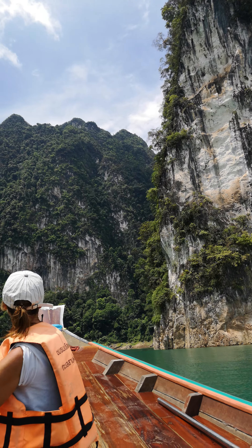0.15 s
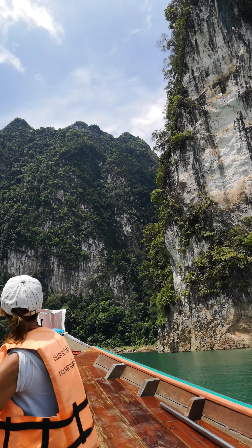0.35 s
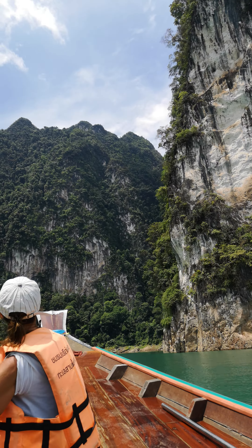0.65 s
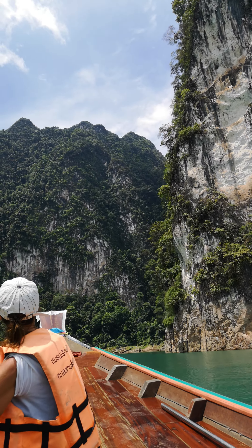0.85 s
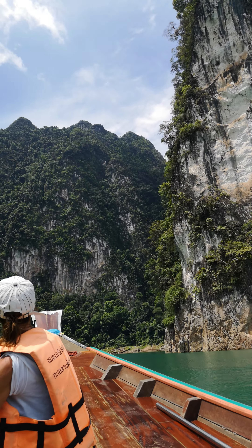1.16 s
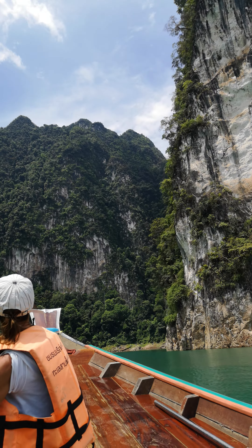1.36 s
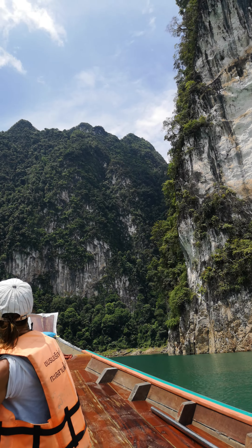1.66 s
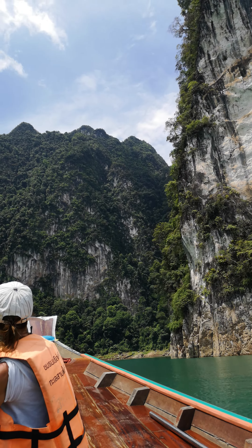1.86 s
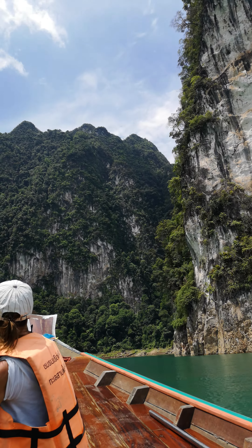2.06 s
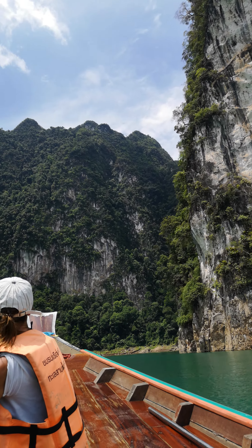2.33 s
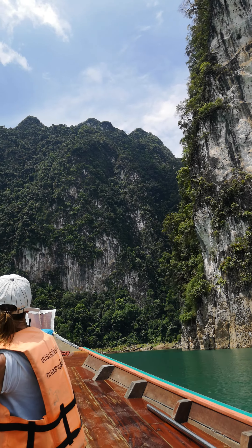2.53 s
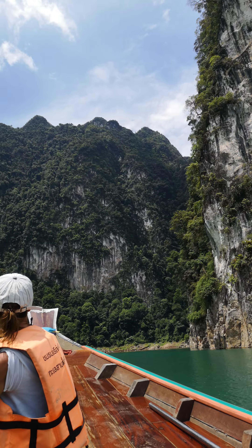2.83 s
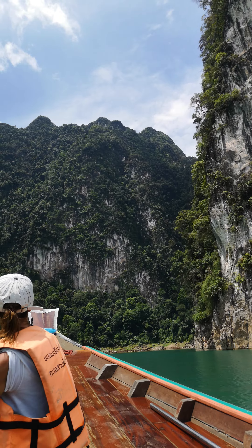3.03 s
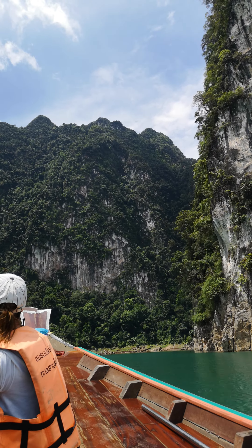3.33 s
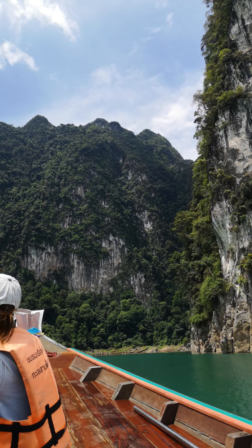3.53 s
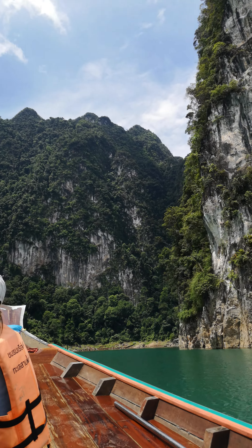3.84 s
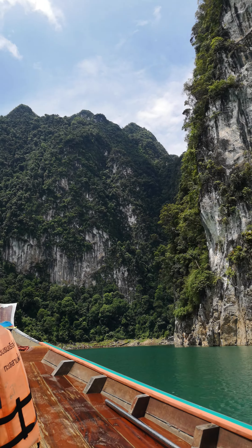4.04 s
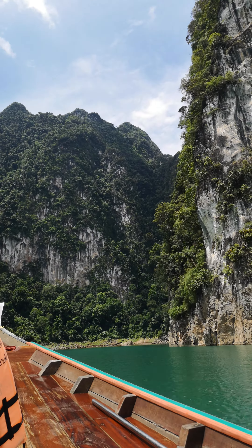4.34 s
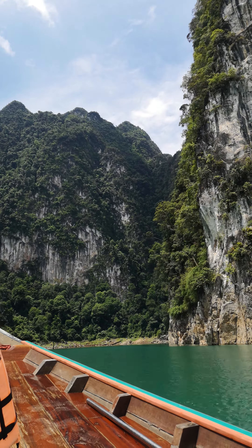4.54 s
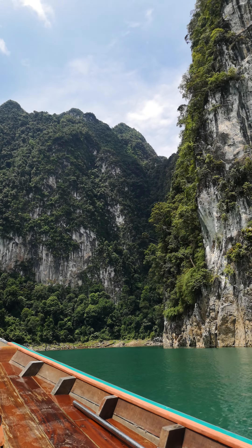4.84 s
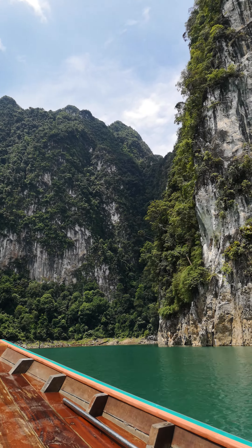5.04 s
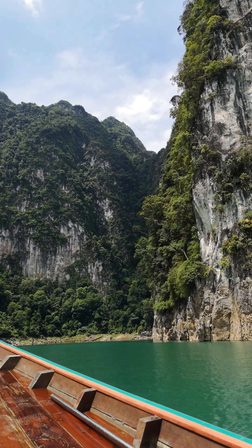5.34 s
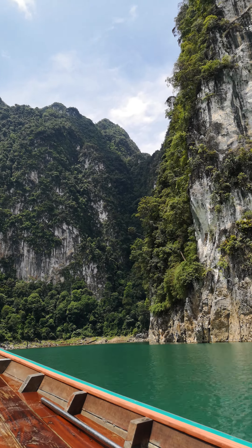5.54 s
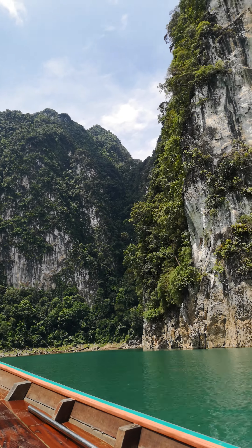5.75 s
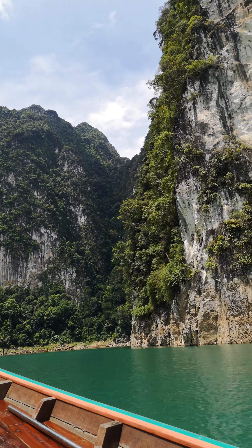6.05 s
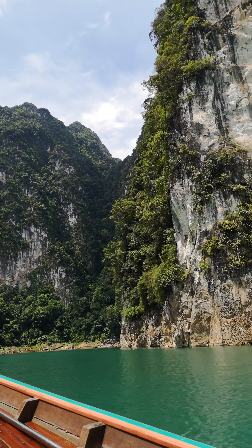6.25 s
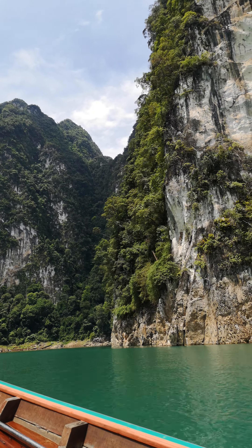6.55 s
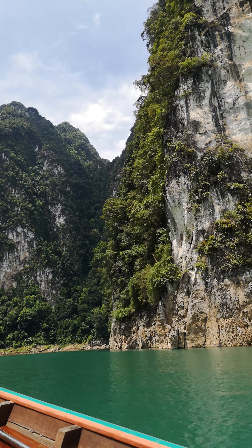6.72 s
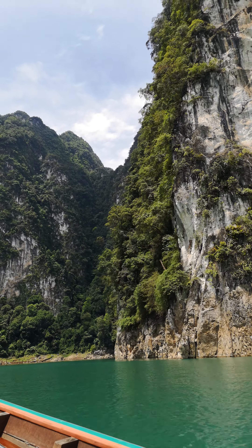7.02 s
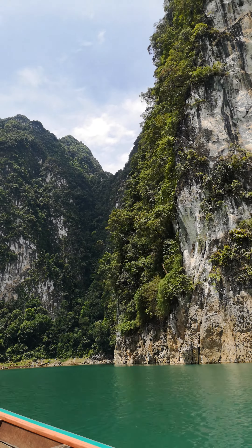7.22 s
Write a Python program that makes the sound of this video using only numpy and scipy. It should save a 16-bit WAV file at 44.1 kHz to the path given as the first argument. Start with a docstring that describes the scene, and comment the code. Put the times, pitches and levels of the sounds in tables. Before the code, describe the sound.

Steady deep motor drone of a wooden boat crossing a lake, a loose fitting buzzing briefly, with hull wash and thumping wind gusts.

```python
"""An engine's exhaust drones on the shaft orders of a longtail boat crossing a lake, heard near the bow.
Its balance follows the revs; the block clatters in step, a thin whine sings with the shaft speed,
and around the highest revs a loose fitting, ringing through its modes, buzzes in bouts.
Shaped noise gives the water along the hull, a sparse patter of bow spray, and a headwind with gusts
and eddies that buffet the microphone; one small click is a sharp pulse over a decaying sine."""
import sys
import numpy as np
from scipy import signal
from scipy.fft import rfft, irfft
from scipy.io import wavfile
from scipy.ndimage import uniform_filter1d

SR = 44100
rng = np.random.default_rng(int(sys.argv[2]) if len(sys.argv) > 2 else 0)


def unload_wav(signal):
    """Save mono or channel-first audio to the path in sys.argv[1] as 16-bit WAV at rate SR, clipped to [-1, 1]."""
    wavfile.write(
        sys.argv[1],
        SR,
        np.round(np.clip(np.atleast_2d(signal).T, -1, 1) * 32767).astype(np.int16),
    )


N = 325458
TIME = np.arange(N) / SR
BINS = np.maximum(np.arange(N // 2 + 1) * SR / N, 1)  # f/Hz of each spectral line

# Engine speed: t/s, shaft rate f/Hz
SHAFT_SPEED = [(0.0, 46.21), (1.0, 46.5), (1.8, 48.11), (2.2, 47.53), (2.8, 47.65), (3.0, 47.02),
               (3.6, 46.76), (4.0, 46.29), (4.6, 46.4), (6.0, 45.55), (6.4, 44.95), (7.38, 45.52)]
START_TURN, CRUISE_HZ = 1.388, 46.5
# Shaft rates at which the drone is tabulated: f/Hz, slow to fast
REVS_HZ = (45.1, 45.7, 46.35, 47.4, 48.0)
# Exhaust drone: multiple of the shaft rate, then level/dB at each of the five rates
DRONE_ORDERS = [(1, -27, -23.5, -21.5, -20, -19.5), (1.5, -56, -49, -47, -42, -46),
                (2, -23, -19.5, -19, -19, -19.5), (2.5, -26.5, -30, -27, -34, -30),
                (3.5, -35, -28, -37, -36.5, -53), (4, -33, -35, -39, -39, -44),
                (4.5, -45, -40.5, -34.5, -36.5, -36), (5, -38.5, -47, -58, -38, -45)]
# Third order, which swells and sinks on its own: t/s, level/dB
THIRD_ORDER_LEVEL = [(0, -25), (0.65, -28.5), (1.2, -23), (1.7, -19.5), (2.1, -24.5), (2.6, -29),
                     (3.15, -22.5), (4.1, -31), (4.5, -25.5), (5.2, -35), (6.2, -45), (6.6, -29.5),
                     (7.38, -37)]
# Faint upper exhaust lines: multiple of the shaft rate, mean level/dB
UPPER_ORDERS = [(5.5, -57), (6, -46), (6.5, -70), (7, -48), (7.5, -55.5), (8, -54), (8.5, -56.5),
                (9, -50.5), (10, -54), (12, -56)]
# Unevenness of the firings, rms, in strength and in timing
FIRING_SCATTER_DB, FIRING_JITTER_TURNS = 0.45, 0.004

# Resonances of block and hull: f/Hz, width/Hz, left relative level/dB, right relative level/dB
BLOCK_MODES = [(415.4, 26, 9, 0), (685, 110, 4.5, -5), (1072, 99, 6, 2), (1477, 240, -20, 1),
               (1882, 39, 5.5, 7.5), (1993, 27, 5.5, 6.5), (2060, 130, -3, -7), (2450, 73, -5.5, -3),
               (2700, 430, -6.5, -4.5), (3080, 880, -9, -8.5), (3530, 180, -10.5, -6.5),
               (4000, 57, -16, -5), (5590, 590, -31, -12), (6570, 19, -33, -33), (8600, 86, -6, -40)]
# Bands of mechanical hiss: f/Hz, width/Hz, left relative level/dB, right relative level/dB
HISS_BANDS = [(4570, 53, -5, 5), (5450, 110, 2, -1), (8700, 210, 0.5, -9), (8950, 30, -9, -10)]
# Successive blows of a two-turn engine cycle: relative level/dB
KNOCKS_DB, VALVES_DB = (-7.0, -14, -7.5, -16), (-6, -11, 3, -9.0)
# Slow swell along the way: t/s, clatter gain/dB, wash gain/dB
SLOW_SWELL = [(0, 0, -0.05), (2.4, 0.5, 0.8), (3.6, -0.1, 0.2), (4.6, -1, -0.5), (5.25, 0.5, 1.5),
              (5.7, 0.5, 0.5), (7.05, 2.5, 1.2), (7.27, 4.5, 1), (7.38, 5.5, 0.5)]

# Whine at cruising speed: its pitch, the rise in Hz per Hz of shaft rate, and its rms waver
WHINE_HZ, WHINE_RISE, WHINE_WAVER_HZ = 6510, 210, 14
# Mean peak levels of tone and octave before flutter; rms depths of flutter and slow fading
WHINE_DB, WHINE_OCTAVE_DB = -62, -79
WHINE_FLUTTER_DB, WHINE_FADE_DB = 4, 1.5

# Modes of the loose fitting: f/Hz, width/Hz, left relative level/dB, right relative level/dB
FITTING_MODES = [(904, 83, -10.5, -5.5), (1366, 43, -30, -0.5), (1430, 36, -17, 1), (1542, 26, -2, 0.5),
                 (1645, 70, -17, -10.5), (1849, 32, -9, 2.5), (1938, 40, -11, 1.5), (2050, 78, -8, -4),
                 (2170, 32, -12, 0), (2337, 36, -12, -3.5), (2740, 160, -23, -17), (3720, 170, -31, -24.5)]
# Its lowest, longest ringing mode: the same columns
FITTING_HUM_MODE = [(778, 24, -6, 3)]
# Bouts of the fitting: start t/s, length/s, buzz level/dB, hum level/dB
RATTLE_BOUTS = [(0.976, 0.1, -31.5, -33), (1.054, 0.13, -28, -36), (1.187, 0.1, -26.5, -32.5),
                (1.696, 0.18, -32, -45), (2.005, 0.14, -29.5, -38), (2.096, 0.31, -26.5, -34.5),
                (2.475, 0.04, -26, -33), (2.536, 0.21, -31, -36), (2.736, 0.078, -27.5, -33.5),
                (2.886, 0.18, -31.5, -37), (3.026, 0.08, -33.5, -37), (3.38, 0.1, -46, -44)]
BOUT_ATTACK_S, BOUT_RELEASE_S, HUM_RELEASE_S = 0.025, 0.055, 0.08
# Treble that follows the force of the rattle: f/Hz, gain/dB
BRIGHT_EDGE = [(900, -34), (1500, -32), (2200, -9.0)]
# Point of the turn at which it is thrown; spacing and scatter of the bounces
THROW_TURN, BOUNCE_TURNS, BOUNCE_JITTER_TURNS = 0.46, 0.125, 0.03
# Contacts and strengths of alternate throws
CONTACTS, THROWS_DB = (5, 5), (0.4, -0.4)
# Scatter of throws and contacts, loss at each bounce, scraping relative to the contacts
THROW_SCATTER_DB, CONTACT_SCATTER_DB = 0.6, 0.9
BOUNCE_LOSS_DB, SCRAPE_DB = 1.0, -1.5

# Click: time, and the scale of its edge and of its body
TICK_S, TICK_EDGE_DB, TICK_BODY_DB = 2.7481, -13.5, -16

# Water along the hull before its swell: f/Hz, left level/dB per Hz, right level/dB per Hz
WASH_SPECTRUM = [(149, -51, -48.5), (448, -65.5, -65.5), (713, -65.5, -60), (1270, -71.5, -70),
                 (1870, -68.5, -64.5), (2680, -74.5, -72), (3730, -78, -81), (4530, -81, -86),
                 (8750, -80.5, -84), (9130, -79, -81.5), (9960, -99, -87.5), (11860, -101, -97.5),
                 (15500, -100, -100)]
# Rms depths of the slow rise and fall of the wash and of the surge of its spray
WASH_SWELL_DB, SPRAY_SURGE_DB = 0.55, 0.4
# Thicker showers of bow spray: peak t/s, length/s, level/dB
SPRAY_SHOWERS = [(1.39, 0.06, -45), (2.504, 0.066, -41), (2.68, 0.21, -47), (4.28, 0.19, -45),
                 (4.68, 0.07, -44), (6.18, 0.09, -43)]
# Colour of the drops: f/Hz, relative level/dB per Hz
DROP_SPECTRUM = [(800, -31), (2200, -7.5), (3100, 0), (4300, -12), (8000, -24), (12000, -42)]
DROPS_PER_S, PATTER_DB = 1500, -53  # rate at each port; level between showers

# Colour of the wind's buffeting: f/Hz, relative level/dB per Hz
BUFFET_SPECTRUM = [(50, -15), (80, 2), (125, 6.5), (170, -1), (230, -3.5), (300, -12), (400, -18.5),
                   (600, -29), (1500, -77), (6000, -90)]
# Colour of its deep rumble: f/Hz, relative level/dB per Hz
RUMBLE_SPECTRUM = [(4, -27), (14, 19.5), (30, 7.5), (65, 12.5), (95, -24), (200, -48), (1500, -100)]
# Mean headwind levels, and the rms depth and rate of their common wander
BUFFET_DB, RUMBLE_DB = -26.7, -32.5
HEADWIND_WANDER_DB, HEADWIND_WANDER_HZ = 0.56, 6.9
# Brief rises and lulls of the headwind: peak t/s, length/s, gain/dB
HEADWIND_CHANGES = [(0.1, 0.28, 3), (2.418, 0.2, 1), (3.1, 0.17, -3), (3.48, 0.23, 2), (4.2, 0.23, -3),
                    (4.87, 0.26, -4)]
# Gusts: peak t/s, length/s, buffet level/dB, rumble level/dB
WIND_GUSTS = [(0.49, 0.58, -24, -18), (0.732, 0.19, -29.5, -29), (1.142, 0.22, -15.5, -17.5),
              (1.573, 0.17, -21, -36), (1.732, 0.11, -20.5, -15.5), (1.998, 0.15, -25.5, -20.5),
              (2.74, 0.22, -18.5, -22), (2.906, 0.091, -17, -13.5), (3.3, 0.16, -30, -20),
              (3.678, 0.079, -20.5, -20), (3.837, 0.093, -25, -34), (4.02, 0.1, -38, -15),
              (4.467, 0.3, -19, -21), (5.183, 0.14, -27, -26), (5.572, 0.37, -21.5, -25),
              (6.043, 0.064, -20.5, -16), (6.313, 0.23, -26, -22), (6.71, 0.2, -22.5, -23),
              (7.353, 0.13, -23, -38)]
# Eddies that strike mostly one port: peak t/s, mean level/dB of the ports, left minus right/dB
PORT_EDDIES = [(.483, -35, 13), (1.086, -28, 19), (1.11, -30, -11), (1.731, -24, -12), (2.885, -26, -16),
               (4.413, -33, -25), (4.557, -33, -14), (6.029, -31, 22), (6.395, -34, 20)]
# Colour of their thump: f/Hz, relative level/dB per Hz
EDDY_SPECTRUM = [(60, -5), (200, 15.5), (400, 3.5), (700, -5), (1500, -29), (6000, -70)]

# Likeness of the two channels: f/Hz, correlation
PORT_LIKENESS = [(40, 0.92), (130, 0.93), (250, 0.68), (400, -0.068), (600, -0.62), (800, -0.75),
                 (1400, 0.17), (2000, -0.65), (2700, 0.074), (3400, 0.63), (4600, -0.39), (5500, 0.081),
                 (8000, 0)]
TOP_HZ = 15200  # edge of the final low-pass


def exhaust(turns, shaft_hz):
    """Fourier synthesis: uneven periodic firings sum to shaft orders whose strengths shift with the revs."""
    angle = 2 * np.pi * (turns + FIRING_JITTER_TURNS * walk(CRUISE_HZ))

    def line(order):
        halves = round(2 * order)
        # half orders lead in phase by 1.19 rad
        return np.sin(halves / 2 * angle + 1.19 * (halves % 2))

    vigour_db = FIRING_SCATTER_DB * walk(CRUISE_HZ)
    drone = 0
    for order, *levels_db in DRONE_ORDERS:
        level_db = np.interp(shaft_hz, REVS_HZ, levels_db)
        # a harder firing lifts the higher orders most
        drone = drone + undb(level_db + (order - 1.5) * vigour_db) * line(order)
    third = undb(curves(THIRD_ORDER_LEVEL)[0] + vigour_db) * line(3)
    upper = 0
    for order, db in UPPER_ORDERS:
        gain = undb(db + 1.94 * walk(1.56))
        phase = round(2 * order) / 2 * angle + 0.31 * walk(4.4)
        upper = upper + gain * np.sin(phase)
    return np.sqrt(2) * (drone + third + upper)  # sine amplitudes from rms levels


def clatter(turns):
    """Impact excitation: four uneven knocks a cycle ring the block; the valves tick over a steady hiss."""
    knocks = strokes(turns + .32, undb(KNOCKS_DB), sharpness=2.2, scatter_db=2.5)
    block = undb(-38.0) * ring(air_noise() * (knocks + 0.12), BLOCK_MODES)
    valves = strokes(turns + 0.29, undb(VALVES_DB), sharpness=0.89, scatter_db=4.5)
    return block + undb(-54.5) * ring(air_noise() * (valves + 0.41), HISS_BANDS)


def whine(shaft_hz):
    """Frequency modulation: a fast-spinning part sings with the revs, fading and fluttering at each port."""
    pitch_hz = WHINE_HZ + WHINE_RISE * (shaft_hz - CRUISE_HZ) + WHINE_WAVER_HZ * walk(40)
    angle = 2 * np.pi * np.cumsum(pitch_hz) / SR
    tone = 0
    for harmonic, db in enumerate((WHINE_DB, WHINE_OCTAVE_DB), 1):
        tone = tone + undb(db + WHINE_FADE_DB * walk(1.9)) * np.sin(harmonic * angle)
    return tone * np.array([undb(WHINE_FLUTTER_DB * walk(60)) for _ in range(2)])


def rattle(turns):
    """Modal excitation: thrown once a turn, a loose fitting bounces and scrapes; its lowest mode hums on."""
    buzz_bouts = [undb(db) * bout(s, length, BOUT_RELEASE_S) for s, length, db, _ in RATTLE_BOUTS]
    hum_bouts = [undb(db) * bout(s, length, HUM_RELEASE_S) for s, length, _, db in RATTLE_BOUTS]
    force, sway = np.max(buzz_bouts, axis=0), np.max(hum_bouts, axis=0)
    rubbing = strokes(turns - THROW_TURN, undb([0, -1]), sharpness=2.0, scatter_db=1.5)
    scrape = unit(air_noise() * rubbing)
    buzz = ring(at_ports(contacts(turns)) + undb(SCRAPE_DB) * scrape, FITTING_MODES)
    # harder blows ring brighter, softer ones duller
    edge = colour(buzz, BRIGHT_EDGE)
    brightness = 1.1 * (force / force.max() - .68)
    return force * (buzz + brightness * edge) + sway * ring(scrape, FITTING_HUM_MODE)


def contacts(turns):
    """Repeated impact: a throw once a turn starts a run of weakening, ever less regular bounces."""
    whole_turns = np.arange(int(turns[0]) + 1, int(turns[-1]) - 1)
    turn, bounce = np.meshgrid(whole_turns, np.arange(max(CONTACTS)))
    late, size = rng.standard_normal((2, *turn.shape))
    throw_db = np.array(THROWS_DB)[turn % 2] + THROW_SCATTER_DB * rng.standard_normal(turn.shape[1])
    jitter = BOUNCE_JITTER_TURNS * np.sqrt(bounce / 2) * late
    at = turn + THROW_TURN + BOUNCE_TURNS * bounce + jitter
    strength = undb(throw_db + CONTACT_SCATTER_DB * size - BOUNCE_LOSS_DB * bounce)
    strength = strength * (bounce < np.array(CONTACTS)[turn % 2])
    samples = np.searchsorted(turns, at)
    return unit(np.bincount(samples.ravel(), strength.ravel(), N))


def bout(start_s, length_s, release_s):
    """Exponential relaxation: chatter builds up, holds and dies away."""
    age = np.maximum(TIME - start_s, 0)
    rise = 1 - np.exp(-age / BOUT_ATTACK_S)
    return rise * np.exp(-np.maximum(age - length_s, 0) / release_s)


def tick():
    """Impulse response: a sharp push and pull starts a brief, damped, dull knock."""
    age = TIME - TICK_S
    swing = age / .00003
    pulse = -swing * np.exp(-swing ** 2 / 2)
    knock = (age > 0) * np.exp(-np.abs(age) / 0.0016) * np.sin(2 * np.pi * 650 * age)
    return undb(TICK_EDGE_DB) * pulse + undb(TICK_BODY_DB) * knock


def wash():
    """Turbulent noise: water sheets off the hull, its spray flickering, its bands swelling independently."""
    spray = undb(SPRAY_SURGE_DB * walk(9.8) + 0.67 * walk(90) + 0.81 * walk(1200))
    water = np.sqrt(SR / 2) * rfft(air_noise() * spray) * undb(across(WASH_SPECTRUM))
    half_octave = np.clip(2 * np.log2(BINS / 400), 0, 10)
    total = 0
    for k in range(11):
        overlap = np.maximum(1 - np.abs(half_octave - k), 0)  # neighbouring bands sum to 1
        total = total + irfft(water * overlap, N) * undb(WASH_SWELL_DB * walk(3.95))
    return total


def splashes():
    """Shot noise: bow spray falls back as random drops, now and then in a thicker shower."""
    drops = (rng.random((2, N)) < DROPS_PER_S / SR) * rng.standard_normal((2, N))
    showers = undb(PATTER_DB) + sum(undb(db) * swell(s, length) for s, length, db in SPRAY_SHOWERS)
    return showers * unit(colour(drops, DROP_SPECTRUM))


def wind():
    """Turbulent pressure: headwind and gusts shake both ports; small eddies thump mostly one."""
    changes_db = sum(db * swell(s, length) for s, length, db in HEADWIND_CHANGES)
    headwind = undb(changes_db + HEADWIND_WANDER_DB * walk(HEADWIND_WANDER_HZ))
    buffet_gusts = sum(undb(db) * swell(s, length) for s, length, db, _ in WIND_GUSTS)
    rumble_gusts = sum(undb(db) * swell(s, length) for s, length, _, db in WIND_GUSTS)
    # independent pressures add in power
    buffet_level = np.hypot(undb(BUFFET_DB) * headwind, buffet_gusts)
    rumble_level = np.hypot(undb(RUMBLE_DB) * headwind, rumble_gusts)
    buffet = buffet_level * unit(colour(air_noise(), BUFFET_SPECTRUM))
    rumble = rumble_level * unit(colour(air_noise(), RUMBLE_SPECTRUM))
    puffs = sum(undb(db + np.array([[pan], [-pan]]) / 2) * swell(s, length_s=0.018)
                for s, db, pan in PORT_EDDIES)
    return buffet + rumble + puffs * unit(colour(rng.standard_normal(N), EDDY_SPECTRUM))


def strokes(turns, sizes, sharpness, scatter_db):
    """Periodic impact: blows spread evenly over a two-turn engine cycle, each fading before the next."""
    beat = turns / 2 * len(sizes)
    k = beat.astype(int)
    scatter = undb(scatter_db * rng.standard_normal(N // 100))
    size = np.asarray(sizes)[k % len(sizes)] * scatter[k]
    return size * (1 - beat % 1) ** sharpness


def ring(x, modes):
    """Modal superposition: a stereo force drives resonances of given strength at each port; rms 1."""
    response = 0
    for k, (hz, width, left, right) in enumerate(modes):
        resonance = 1 / (1 + 1j * (BINS ** 2 - hz ** 2) / (BINS * width))
        # successive modes alternate in sign
        response = response + undb([[left], [right]]) * (-1) ** k * resonance
    return unit(irfft(rfft(x) * response, N))


def air_noise():
    """Partial coherence: sum and difference of two noises give each frequency its port correlation."""
    likeness = np.clip(across(PORT_LIKENESS)[0], -1, 1)
    mid, side = rfft(rng.standard_normal((2, N)))
    mid = mid * np.sqrt((1 + likeness) / 2)
    side = side * np.sqrt((1 - likeness) / 2)
    return irfft([mid + side, mid - side], N)


def at_ports(x):
    """Phase difference: one sound reaches two ports out of step by a frequency-dependent angle."""
    angle = np.arccos(np.clip(across(PORT_LIKENESS)[0], -1, 1))
    return irfft(rfft(x) * np.array([np.exp(-1j * angle), np.ones_like(angle)]), N)


def colour(x, spectrum):
    """Linear filtering: weight the spectrum by a table of f/Hz, gain/dB."""
    return irfft(rfft(x) * undb(across(spectrum)), N)


def walk(rate):
    """Smoothed random steps: values held 1 / rate seconds, averaged twice, scaled to rms 1."""
    k = max(int(SR / rate), 1)
    held = rng.standard_normal(N)[np.arange(N) // k]
    return unit(uniform_filter1d(uniform_filter1d(held, k), k))


def swell(peak_s, length_s):
    """Gaussian envelope: a smooth rise and fall, length_s wide at 1/e of its peak."""
    return np.exp(-(2 * (TIME - peak_s) / length_s) ** 2)


def curves(table):
    """Linear interpolation in time of each column of a table."""
    s, *columns = np.transpose(table)
    return [np.interp(TIME, s, c) for c in columns]


def across(table):
    """Linear interpolation over log frequency of each column of a table."""
    hz, *columns = np.transpose(table)
    return np.array([np.interp(np.log(BINS), np.log(hz), c) for c in columns])


def undb(db):
    """Logarithmic level: decibels to amplitude ratio."""
    return 10 ** (np.asarray(db) / 20)


def unit(x):
    """Normalization: scale to rms 1."""
    return x / np.sqrt(np.mean(x ** 2))


def scene():
    """Superposition: one shaft drives drone, clatter, whine and rattle amid water and wind."""
    shaft_hz, = curves(SHAFT_SPEED)
    turns = START_TURN + np.cumsum(shaft_hz) / SR
    clatter_db, wash_db = curves(SLOW_SWELL)
    engine = exhaust(turns, shaft_hz) + undb(clatter_db) * clatter(turns) + whine(shaft_hz)
    water = undb(wash_db) * wash() + splashes()
    return engine + rattle(turns) + tick() + water + wind()


def record(dry):
    """Saturation and band limiting: high peaks are rounded, both ends faded, the top cut."""
    rounded = dry / (1 + (dry / .75) ** 6) ** (1 / 6)
    edges = np.minimum(np.minimum(TIME, TIME[-1] - TIME) / .003, 1)
    low_pass = signal.ellip(10, .2, 80, TOP_HZ, fs=SR, output="sos")
    return signal.sosfilt(low_pass, rounded * edges)


dry = scene()
out = record(dry)
unload_wav(out)
```